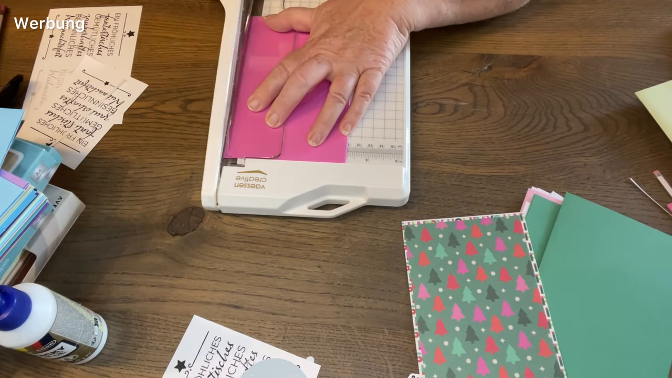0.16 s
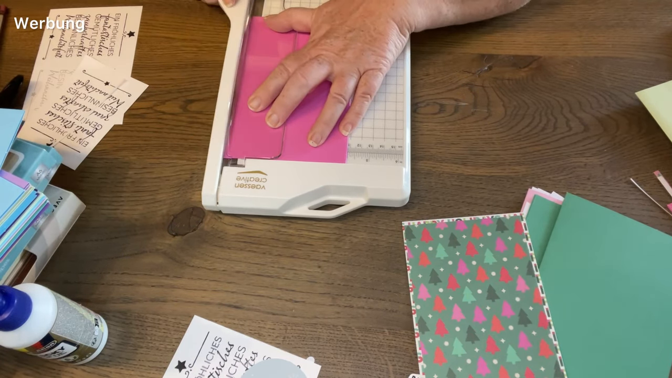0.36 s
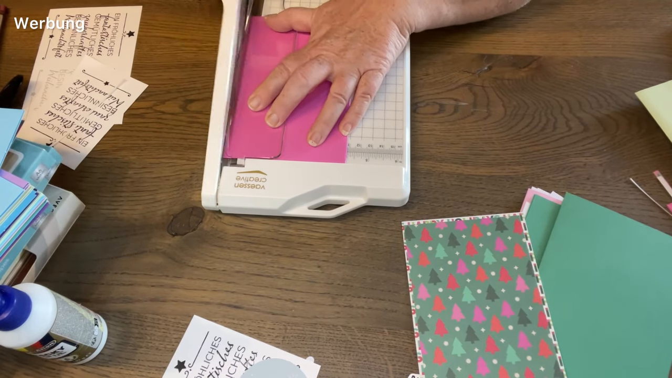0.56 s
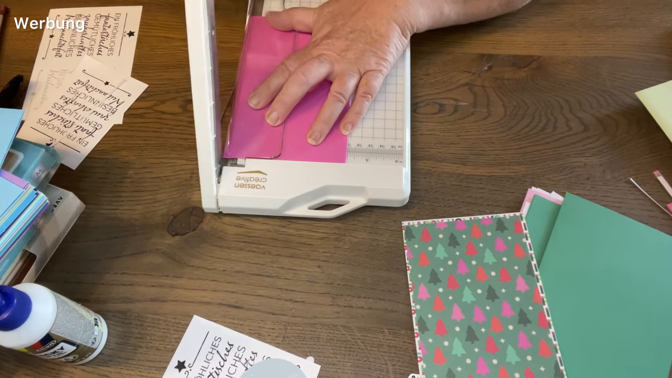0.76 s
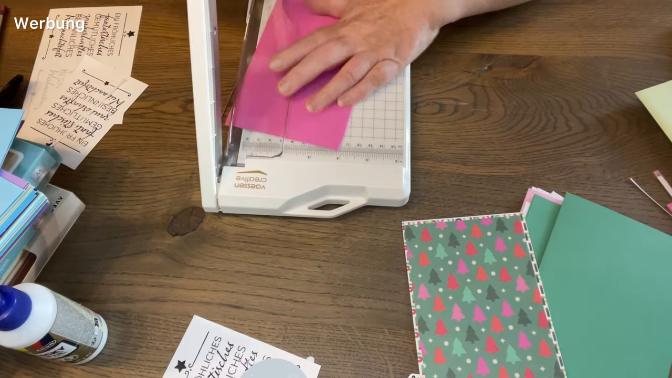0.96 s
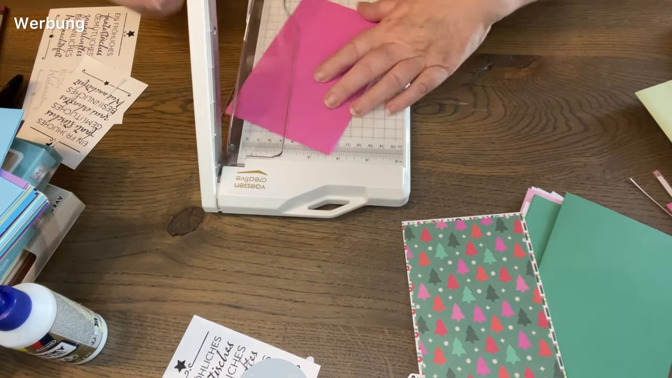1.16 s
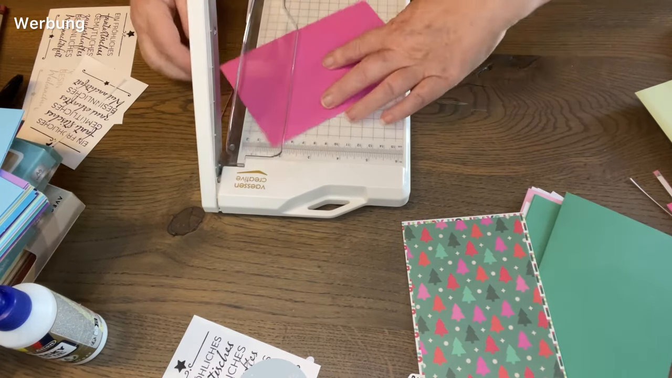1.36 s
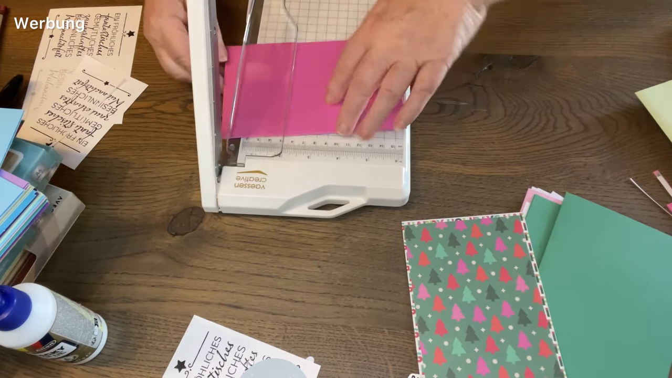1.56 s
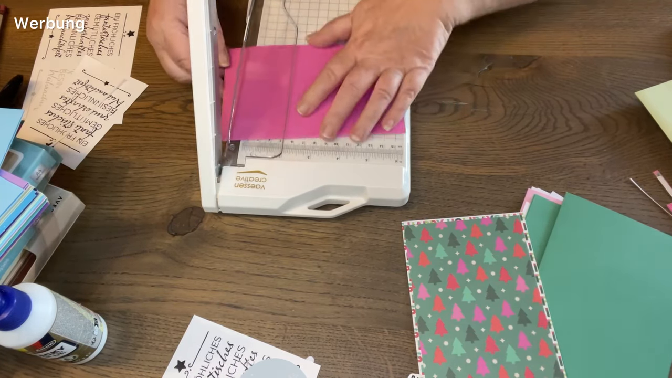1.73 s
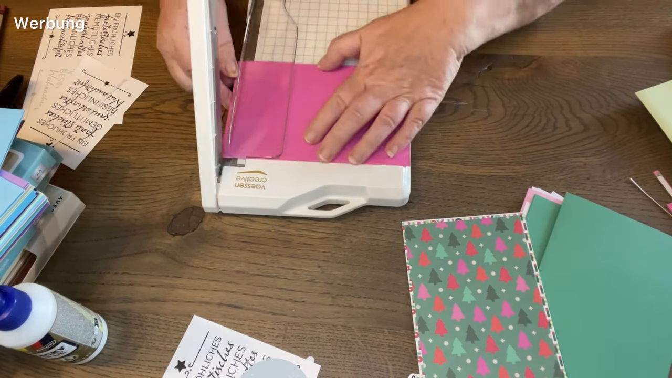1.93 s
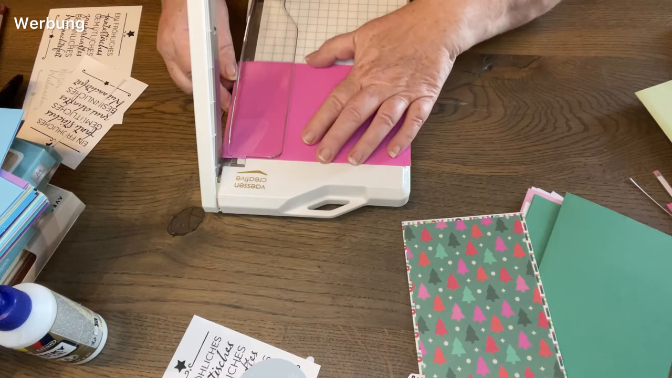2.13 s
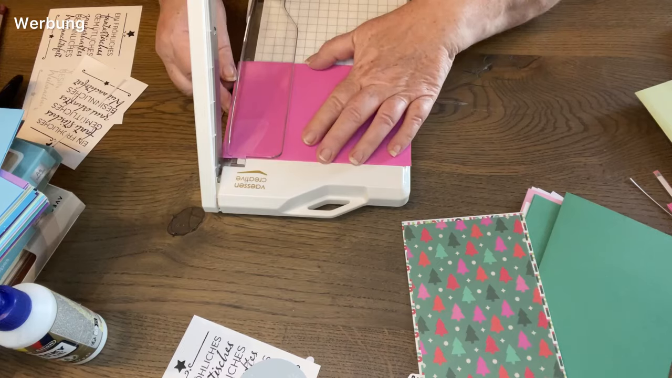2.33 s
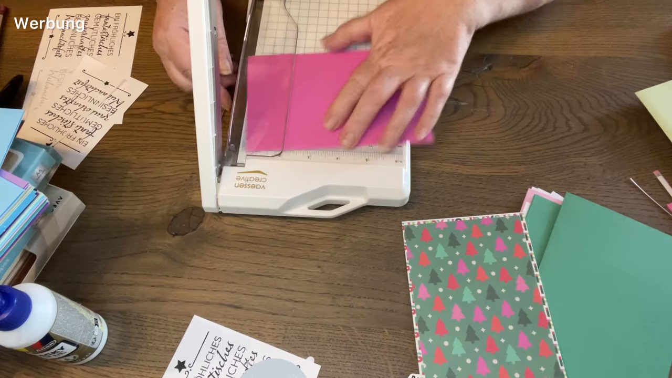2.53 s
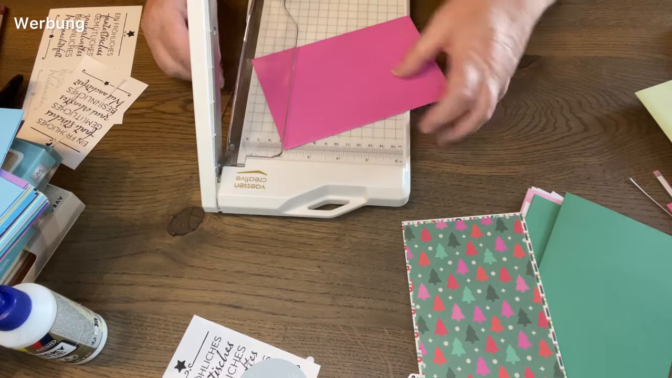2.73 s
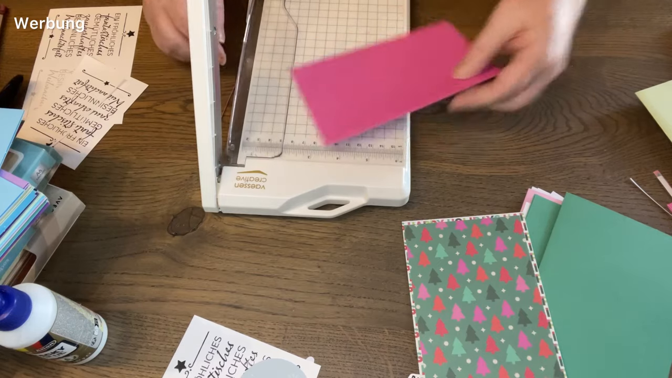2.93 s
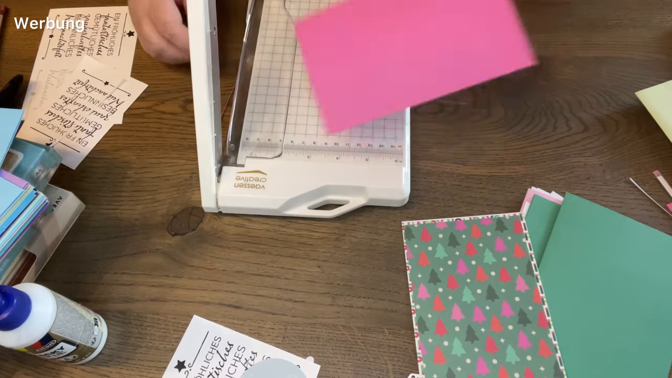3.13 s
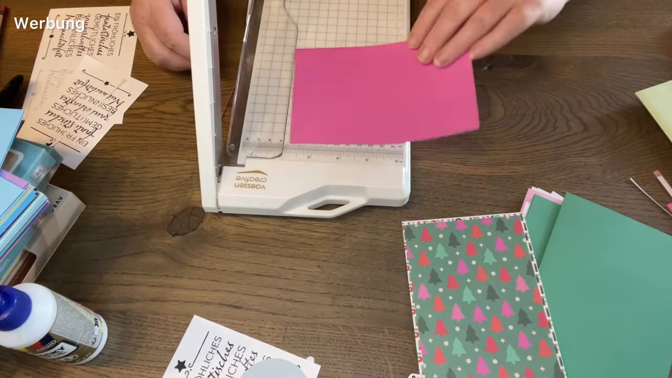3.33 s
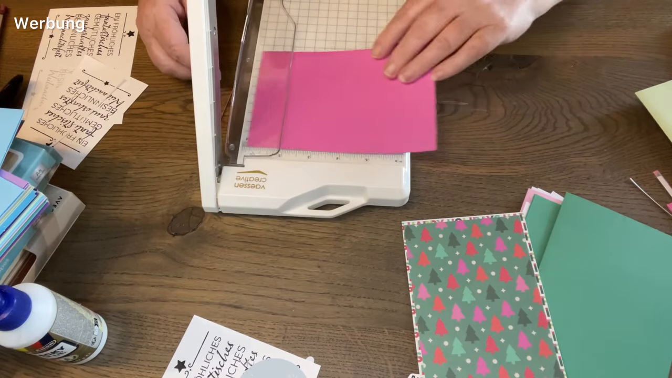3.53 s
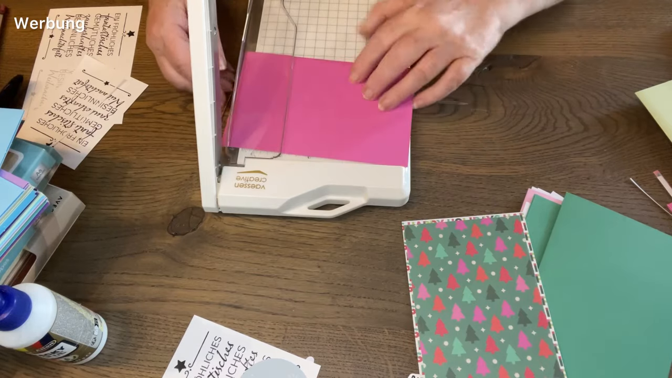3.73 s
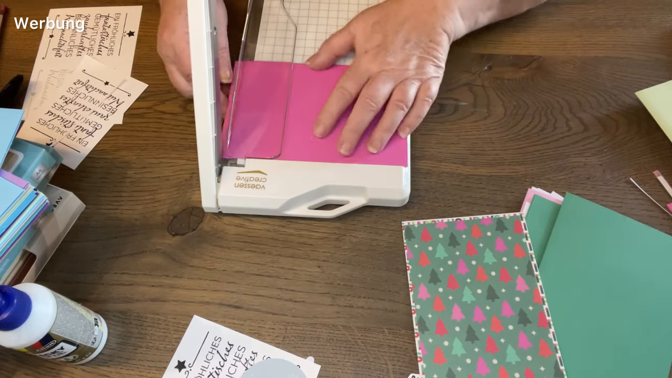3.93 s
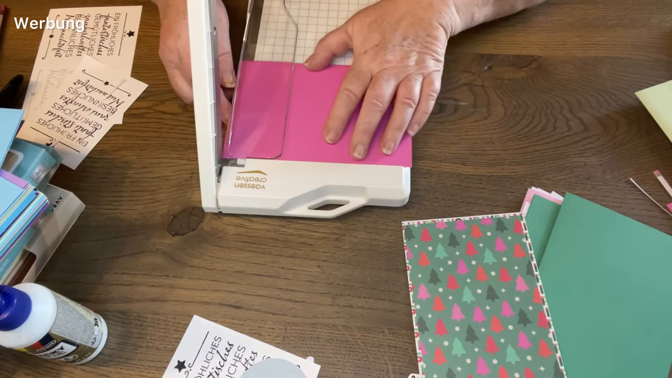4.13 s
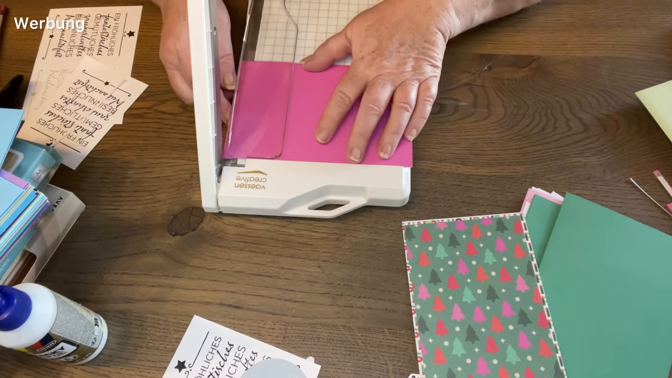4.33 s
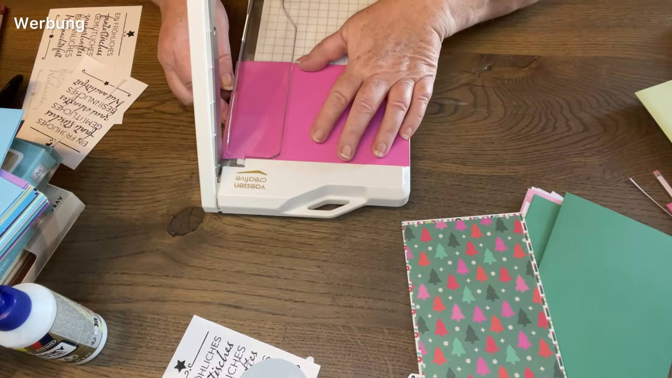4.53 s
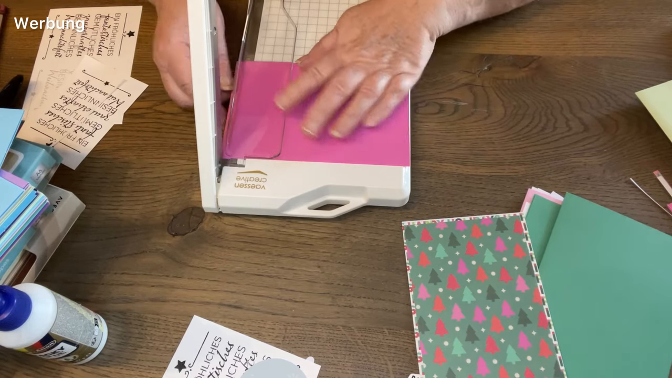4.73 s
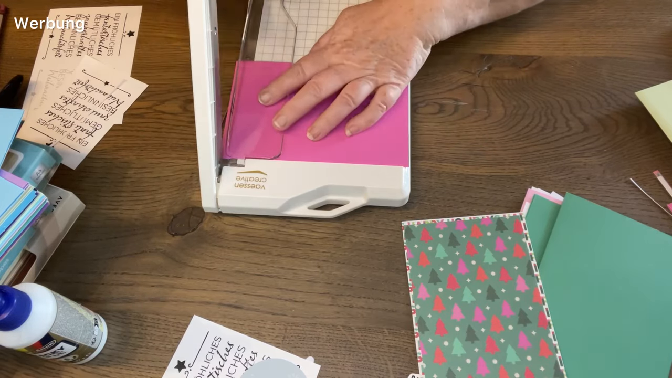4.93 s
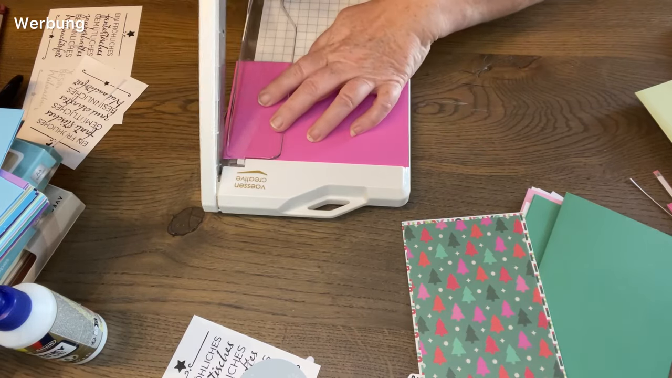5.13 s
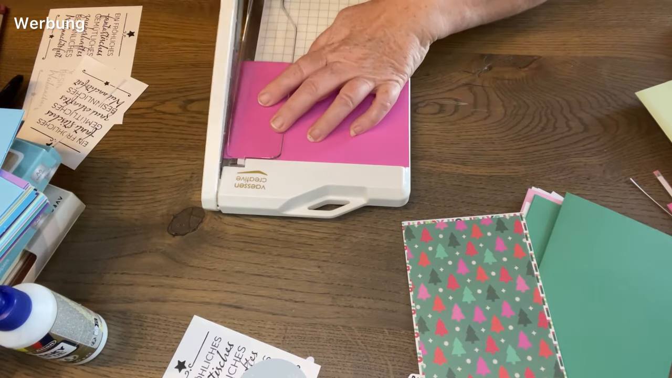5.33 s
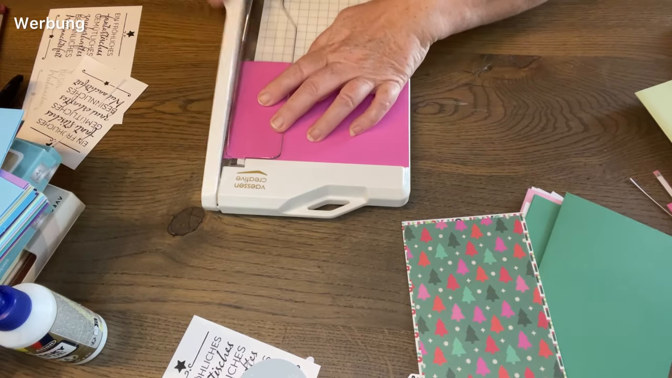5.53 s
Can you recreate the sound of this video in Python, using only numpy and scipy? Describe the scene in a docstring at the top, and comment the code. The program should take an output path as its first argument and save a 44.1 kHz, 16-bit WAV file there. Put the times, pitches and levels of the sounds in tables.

```python
"""Lever paper trimmer cutting card

A trimmer on a wooden craft table, heard by a phone hanging above it. The blade arm grinds on the steel edge
(micro-slips ringing steel, base and table), shears the card (swelling crackle) and lands on its stop; between
cuts a hand slides card (filtered hiss with drones) and taps it on the hollow plastic base (short rattles ringing
base and table). A small quiet room adds a brief diffuse tail over a faint room tone."""
import sys
import numpy as np
from scipy import signal
from scipy.fft import rfft, irfft, next_fast_len
from scipy.io import wavfile
from scipy.ndimage import uniform_filter1d, map_coordinates

SR = 44100
rng = np.random.default_rng(int(sys.argv[2]) if len(sys.argv) > 2 else 0)


def generate_wav(signal):
    """Clip the signal to [-1, 1] and save it as 16-bit WAV at the path in sys.argv[1]."""
    frames = np.transpose(np.atleast_2d(signal))
    scaled = np.clip(frames, -1, 1) * 32767
    pcm = np.round(scaled).astype(np.int16)
    wavfile.write(sys.argv[1], SR, pcm)


N = 250223
TIME = np.arange(N) / SR

# hollow plastic base, free modes: [f/Hz, relative level/dB, free t60/s]
BASE_MODES = [(530, -24, 0.036), (692, -4, 0.26), (733.5, -4.5, 0.3), (847.4, -9.5, 0.27),
              (930, -8, 0.0084), (1133, -0.5, 0.088), (1371, -1, 0.024), (1556, 1, 0.078), (1697, -2, 0.12),
              (1902, 3, 0.058), (2016, 6, 0.017), (2262, 0, 0.1), (2626, 2, 0.037), (3090, 2, 0.021),
              (3450, -3.5, 0.085), (3880, -2, 0.047), (4400, -5, 0.0091)]
# wooden table top modes: [f/Hz, relative level/dB, t60/s]
TABLE_MODES = [(59.7, -1, 0.42), (89, -11.5, .3), (137, 1.5, 0.1), (164, -4.5, 0.11), (204, 6.5, 0.085),
               (261, 7.5, 0.045), (345, -6, 0.019), (465, 1, 0.085)]
# steel blade modes: [f/Hz, relative level/dB, t60/s]
BLADE_MODES = [(2940, -4, .012), (3400, -1, 0.01), (3920, 1.5, 0.012), (4800, 2.5, 0.012), (5300, -5, .008),
               (6300, -2, 0.031), (8900, -5.5, 0.008), (10260, -2, .008)]
HAND_T60_SHARE = .4  # a hand on the base shortens its ring


def undb(db):
    """Amplitude factor of a level in dB."""
    return 10 ** (np.asarray(db) / 20)


def unit(x):
    """Scale to unit RMS."""
    return x / np.sqrt(np.mean(x ** 2))


def colour(x, points):
    """Filter by (f/Hz, level/dB) points, interpolated over log frequency, to unit RMS."""
    hz, db = np.transpose(points)
    size = next_fast_len(len(x))
    f = np.maximum(np.fft.rfftfreq(size, 1 / SR), 1)
    gain = undb(np.interp(np.log(f), np.log(hz), db))
    return unit(irfft(rfft(x, size) * gain, size)[:len(x)])


def split_treble(x):
    """Parts below and above a broad crossover."""
    crossover_hz = 7000
    weight = np.clip(np.fft.rfftfreq(N, 1 / SR) / crossover_hz - .5, 0, 1)
    top = irfft(rfft(x) * weight, N)
    return x - top, top


def wander(rate_hz):
    """Random levels, rate_hz of them a second, joined by straight ramps."""
    k = int(SR / rate_hz)
    steps = np.repeat(rng.standard_normal(N // k + 1), k)
    return uniform_filter1d(steps, k)[:N]


def grit(spread_db, flicker_db, rate_hz):
    """Dense micro-slips of uneven size whose strength flickers as the grip changes."""
    size_db = spread_db * rng.exponential(size=N)
    return rng.standard_normal(N) * undb(size_db + flicker_db * wander(rate_hz))


def ring(modes, gain_db=0, length_s=0.18):
    """Impulse response: a sum of exponentially decaying sine modes."""
    hz, db, t60 = np.transpose(modes)[:, :, None]
    t = TIME[:int(length_s * SR)]
    decay = np.exp(-np.log(1000) * t / t60)
    return np.sum(undb(db + gain_db) * decay * np.sin(2 * np.pi * hz * t), 0)


def through(x, response):
    """Drive a resonant body with x, to unit RMS."""
    return unit(signal.fftconvolve(x, response)[:N])


def rubbed(slips, modes, shift_db, rate_hz):
    """The contact point travels, so each mode swells and fades on its own."""
    total = 0
    for mode in modes:
        excited = signal.oaconvolve(slips, ring([mode], length_s=0.13))[:N]
        total = total + undb(shift_db * wander(rate_hz)) * excited
    return unit(total)


def stroke_curve(strokes, column):
    """One column over time; the level is silent outside the strokes."""
    rows = []
    for stroke in strokes:
        first, last = stroke[0], stroke[-1]
        rows += [(first[0] - .01, -120, *first[2:]), *stroke, (last[0] + .01, -120, *last[2:])]
    rows = np.array(rows)
    return np.interp(TIME, rows[:, 0], rows[:, column])


def room_tone():
    """Faint coloured noise, partly unlike left and right; its level dips briefly."""
    level_db = -77.5
    # spectrum: [f/Hz, relative level per Hz/dB]
    air_spectrum = [(18, -40), (40, -9.5), (110, -14), (150, 8.5), (210, -7.5), (470, -10.5), (2000, -17.5),
                    (16000, -28)]
    # brief dip: from t/s, to t/s, depth/dB
    start_s, end_s, depth_db = (4.47, 4.76, -8.5)
    dip_db = depth_db * np.clip(np.minimum(TIME - start_s, end_s - TIME) / 0.038, 0, 1)
    mid, side = (colour(rng.standard_normal(N), air_spectrum) for _ in range(2))
    return undb(level_db + dip_db) * (mid + .4 * np.outer([1, -1], side))


def room(x):
    """Diffuse tail of octave noise bands, each with its own decay, partly unlike at the two ports."""
    # tail: [f/Hz, t60/s, share unlike at the two ports]
    tail_hz, tail_t60, tail_apart = np.transpose([(99, 0.2, 0.4), (300, 0.22, 0.7), (600, 0.3, 3),
                                                  (2020, 0.13, 1.2), (5260, 0.15, 3.7),
                                                  (15200, 0.094, 0.78)])
    t, tail = TIME[:int(.4 * SR)], 0
    for hz in 60 * 2. ** np.arange(8.5):
        t60, apart = (np.interp(np.log(hz), np.log(tail_hz), c) for c in (tail_t60, tail_apart))
        octave = signal.butter(2, [hz / 2 ** .5, hz * 2 ** .5], "band", fs=SR, output="sos")
        mid, side = signal.sosfilt(octave, rng.standard_normal((2, len(t))))
        pair = np.array([mid + apart * side, mid - apart * side]) / np.hypot(1, apart)
        tail = tail + pair * np.exp(-np.log(1000) * t / t60)
    tail = tail * np.minimum(t / 0.0085, 1)  # onset ramp, s
    tail = tail / np.sqrt(np.sum(tail ** 2) / 2)
    return signal.fftconvolve(x[None], tail, axes=1)[:, :N]


def ports(x, column):
    """Sound bends round the phone to each port with a lag and shade that depend on where it comes from."""
    # phone ports: [f/Hz, left lead for the trimmer/rad, left lead for the sliding card/rad, left minus right/dB]
    port_table = np.transpose([(60, 0, 0, -.3), (700, -.1, -.4, -2.8), (1400, -.15, -.4, -.9),
                               (2100, -1.1, -1.1, -1.1), (3300, -.8, -2.3, -.5), (4400, -.3, -2.3, .1),
                               (5200, -1.7, -3.2, -.1), (6400, -2.1, -3.3, -.2), (7750, -3.1, -3.0, -.3),
                               (11000, -6.3, -6.4, -.1), (14300, -6.2, -6.1, -.1), (16000, -9, -9, -.1)])
    size = next_fast_len(N)
    f = np.fft.rfftfreq(size, 1 / SR)
    shade = undb(np.interp(f, port_table[0], port_table[-1]) / 2)
    half = shade * np.exp(.5j * np.interp(f, port_table[0], port_table[column]))
    return irfft(rfft(x, size) * np.array([half, 1 / half]), size)[:, :N]


def slide():
    """Card dragged over ridged plastic: hiss, with a drone of base and table."""
    # strokes of card and skin: [t/s, length/s, hiss level/dB, swell by the end/dB, dull base drone over hiss/dB,
    # sharp base drone over hiss/dB, table rumble over hiss/dB, extra treble/dB]
    strokes = [(0.875, 0.21, -53.5, -2, -9, -6.5, -2, 7), (1.134, 0.37, -60, 4.5, -9.5, -9, -21, 3),
               (1.618, 0.29, -58.5, 5, -7, -4, -6, 2), (1.99, 0.061, -64.5, 7, -2.5, 0.5, -0.5, 1.5),
               (2.36, 0.098, -78, 4, -14, -12, -10, 1), (2.472, 0.1, -56.5, 2, -9, -6, -12, 7),
               (2.631, 0.12, -55, -8, -16, -3, -15, 12), (2.808, 0.088, -55.5, -3, 1, -9.5, -11, -4),
               (2.938, 0.15, -49, -12.5, -11, -15, -11, 0), (3.155, 0.034, -61.5, 10, -6, -13, -9, 0.5),
               (3.261, 0.43, -62.5, 8.5, -9, -17, -20.5, -3), (3.75, 0.05, -64.5, 7.5, -23, -28, -15, 7),
               (3.875, 0.17, -49.5, -17, -2.5, -7, -1.5, -4), (4.052, 0.042, -58.5, 1, -15, -11, -12, 1),
               (4.261, 0.13, -62, -4, -10, -5, -4, -3), (4.634, 0.017, -67.5, 0.5, -18.5, -11, -19.5, -1),
               (4.758, 0.17, -64.5, -9, -20.5, -14.5, -7.5, 0.5),
               (4.942, 0.21, -69.5, 7.5, -5, -2.5, -3, -4)]
    # hiss spectrum: [f/Hz, relative level per Hz/dB]
    hiss_spectrum = [(900, -27.5), (1600, -3.5), (3500, 0.5), (6000, -2.5), (8000, -5), (11500, -6.5),
                     (14500, -9), (16000, -18)]
    grip_db_s, lift_db_s = 507.5, 394  # rise and fall rates of a stroke
    dull_count = 9  # base modes under the card; those above answer its edge

    s, length, db, swell_db, dull_db, sharp_db, table_db, treble_db = np.transpose(strokes)[:, :, None]
    t = TIME[::32]
    swell = swell_db * np.clip((t - s) / length, 0, 1)
    before_db = grip_db_s * np.maximum(s - t, 0)
    after_db = lift_db_s * np.maximum(t - s - length, 0)
    stroke = undb(db + swell - before_db - after_db)
    hiss, dull, sharp, rumble, treble = (
        np.interp(TIME, t, (stroke * undb(g)).sum(axis=0))
        for g in (0, dull_db, sharp_db, table_db, treble_db))

    slips = grit(spread_db=1.8, flicker_db=2.8, rate_hz=55.) * undb(3.5 * wander(22.))
    held = np.array(BASE_MODES) * [1, 1, HAND_T60_SHARE ** 2]  # hand and card both damp the base
    low = rubbed(slips, held[:dull_count], shift_db=6.5, rate_hz=30.)
    high = rubbed(slips, held[dull_count:], shift_db=6.5, rate_hz=30.)
    table = rubbed(slips, TABLE_MODES, shift_db=5.0, rate_hz=25.)
    rustle, top = split_treble(colour(slips, hiss_spectrum))
    return hiss * rustle + treble * top + dull * low + sharp * high + rumble * table


def table_responses(t):
    """Table answers to a blow, both late: a thud of the upper modes, a slow sway of the lowest two."""
    thud_hz, lag_s, sway_rise_s = 194, 0.0036, 0.03  # modes round thud_hz take up a blow best
    upper = TABLE_MODES[2:]
    late = np.maximum(t - lag_s, 0)
    push = late * np.exp(-late / 0.00027)
    uptake_db = -4 * np.abs(np.log2(np.array(upper)[:, :1] / thud_hz))
    thud = signal.fftconvolve(push, ring(upper, uptake_db))[:len(t)]
    sway = ring(TABLE_MODES[:2], length_s=.45) * np.minimum(t / sway_rise_s, 1)
    return thud, np.roll(sway, int(lag_s * SR))


def base_knock(rattle, shiver, hz):
    """Base struck by a rattle: detuned modes, the struck spot's own pitch and a dry knock round it."""
    detune = .035  # the hand's weight shifts the modes from blow to blow
    own_db, own_t60_s, knock_db = -3, 0.046, -2.5
    n = len(rattle)
    base_hz = np.array(BASE_MODES)[:, :1]
    # a soft contact loses the modes above its pitch
    above_db = -5 * np.log2(1 + (base_hz / hz / 1.4) ** 3)
    below_db = -4 * np.log2(1 + (hz / base_hz / 1.6) ** 2)
    held = np.array(BASE_MODES) * [1 + detune * rng.standard_normal(), 1, HAND_T60_SHARE]
    modes = signal.fftconvolve(rattle + shiver, ring(held, above_db + below_db))[:n]
    own = signal.fftconvolve(rattle, ring([(hz, 0, own_t60_s)]))[:n]
    # dense, quickly damped modes between them merge into a dry knock
    band = signal.butter(3, [hz / 2.5, hz * 1.8], "band", fs=SR, output="sos")
    knock = signal.sosfilt(band, rattle + shiver)
    levels_db = 0, own_db, knock_db
    return sum(undb(g) * p / np.abs(p).max() for g, p in zip(levels_db, (modes, own, knock)))


def taps():
    """Each contact is a short rattle: it snaps, knocks the base broadly round its pitch and thuds the table."""
    # taps and blows: [t/s, base peak level/dB, snap over it/dB, table thud over it/dB, contact time scale/s, base f/Hz]
    contacts = [(0.241, -14, -14, -30, 0.0089, 1120), (0.256, -16.5, 6.5, -33, 0.012, 3870),
                (0.263, -5.5, -20, -4, 0.0051, 1677), (0.2666, -10, -28, 6.5, 0.007, 1560),
                (0.269, -9.5, -4, -8, 0.0026, 628), (0.443, -39, -23, -30, 0.008, 2180),
                (0.486, -23.5, -28, -45, 0.03, 1630), (0.505, -22.5, -32, -48, 0.013, 1540),
                (0.523, -16, -8, -34, 0.0053, 2550), (0.526, -24.5, -30.5, -20, 0.0046, 730),
                (0.752, -37.5, -24, -2.5, 0.012, 1100), (0.821, -39.5, -12, -2, 0.0055, 1670),
                (0.852, -26, -25, -32, 0.0043, 1790), (0.897, -9, -42.5, -4, 0.005, 623),
                (0.906, -22.5, -30, -14, 0.0041, 470), (1.066, -39, -10.5, 3.5, 0.016, 710),
                (1.399, -44, 4, -15, 0.017, 1710), (1.483, -37.5, -9.5, -48, 0.013, 783),
                (1.585, -42, -13.5, -5, 0.011, 1680), (1.654, -54, -13.5, 10.5, 0.012, 646),
                (1.745, -27.5, -40.5, -31, 0.01, 794), (1.781, -41, -27.5, 2, 0.011, 730),
                (1.806, -39, -36, -11, 0.014, 1100), (1.903, -26.5, -11.5, -51.5, 0.0043, 1750),
                (1.915, -39, -18.5, -30.5, 0.012, 1098), (2.264, -44.5, -25.5, -4, 0.012, 728),
                (2.487, -43, -8.5, -9.5, 0.017, 744), (2.813, -34, -22.5, -39, 0.0086, 752),
                (2.815, -31.5, -24.5, -39, 0.0067, 2240), (2.912, -49, -28.5, 8, 0.0062, 443),
                (2.951, -51.5, -22.5, 16.5, 0.012, 478), (2.972, -43, -18.5, -0.5, 0.012, 1510),
                (3.175, -33.5, -24.5, -29, 0.0065, 1200), (3.182, -24, -31, -35, 0.0046, 927),
                (3.199, -34.5, -26, -11, 0.012, 555), (3.258, -39, -25, -30, 0.0064, 750),
                (3.338, -44, -29, -38, 0.0076, 396), (3.354, -19, -39, -41, 0.011, 1290),
                (3.359, -20, -11, -37, 0.01, 1698), (3.386, -35.5, -28, -19.5, 0.024, 856),
                (3.489, -50.5, 9.5, -24.5, 0.0076, 660), (3.664, -51.5, -16.5, 8, 0.006, 450),
                (3.676, -30, -22, -11.5, 0.014, 2350), (3.682, -22, 10.5, -17, 0.0015, 2190),
                (3.694, -35.5, -17.5, 1, 0.01, 1780), (3.824, -42, -18.5, 0.5, 0.0017, 1000),
                (3.897, -52, -8, 15.5, 0.0037, 672), (3.928, -21, -14, -32, 0.0039, 1920),
                (3.931, -22.5, -21, -33, 0.0047, 3110), (4.107, -32.5, -24, -25, 0.01, 1510),
                (4.113, -27.5, -9.5, -27, 0.021, 1420), (4.147, -42.5, -19, -1.5, 0.0064, 2670),
                (4.224, -51.5, -19.5, -10, 0.019, 503), (4.343, -56, -23.5, -5, 0.012, 497),
                (4.419, -52.5, -19, -26.5, 0.01, 1507), (4.427, -44, -21.5, -24.5, 0.013, 1820),
                (4.447, -46, -18.5, -27, 0.014, 1607), (4.765, -52, 7, -8, 0.0058, 1898),
                (4.851, -49, -4, -24, 0.0051, 704), (4.864, -38.5, -9.5, -27, 0.0042, 2950),
                (4.94, -54.5, 10, -21, 0.0085, 1890), (5.028, -38.5, -27.5, 6.5, 0.0096, 1756),
                (5.53, -16, -11.5, -29, 0.0051, 2280), (5.533, -16, -27.5, -9, 0.0048, 620),
                (5.538, -19, -7, 7.5, 0.0039, 460), (5.56, -10.5, 3.5, -23, 0.0043, 4390),
                (5.573, -15, -8, 5.5, 0.0039, 1930), (5.576, -14, -18, -4.5, 0.0021, 684)]
    sway_db, heavy_db = -32, -11  # sway over thud; blows below heavy_db rock the table top less
    out, t = np.zeros(N + SR), TIME[:int(.45 * SR)]
    snap_filter = signal.butter(1, [4800, 7200], "band", fs=SR, output="sos")
    thud, sway = table_responses(t)
    for s, db, snap_db, thud_db, contact_s, hz in contacts:
        x = t / max(contact_s, .0005)
        grains = rng.standard_normal(len(t)) * undb(3.0 * rng.exponential(size=len(t)))
        rattle = grains * x ** 0.89 * np.exp(-2.3 * x)
        # card and loose guide shiver on for a moment
        shiver = undb(-30.0) * rng.standard_normal(len(t)) * (1 - np.exp(-x)) * np.exp(-t / 0.049)
        body = base_knock(rattle, shiver, hz)
        # the snap belongs to the hardest instant of the contact
        snap = signal.sosfilt(snap_filter, rattle * (x * np.exp(-2.5 * x)) ** 3.3)
        rock_db = thud_db + sway_db + 1.3 * min(db - heavy_db, 0)
        levels_db = 0, snap_db, thud_db, rock_db
        sound = sum(undb(g) * p / np.abs(p).max() for g, p in zip(levels_db, (body, snap, thud, sway)))
        i = max(int((s - .0007) * SR), 0)
        out[i:i + len(t)] += undb(db) * sound
    return out[:N]


def shear():
    """Fibres part in a fine crackle; blade and base take up part of it."""
    # card shearing, strip tearing free: [loudest t/s, rise/s, peak level/dB, fall t60/s, body over peak/dB, extra treble/dB]
    tears = [(0.258, 0.017, -16.5, 0.066, -26, 4.5), (0.523, 0.028, -22.5, 0.13, -32.5, -4.5),
             (0.559, 0.049, -19.5, 0.24, -19, -2), (5.563, 0.04, -21.5, 0.053, -18, 5)]
    # crackle spectrum: [f/Hz, relative level per Hz/dB]
    fibre_spectrum = [(900, -36), (1600, -9), (2600, -3.5), (3800, -4), (6300, 0.5), (8000, -3.5),
                      (10000, -5.5), (13500, -11.5), (16000, -16.5)]
    rise_db, rise_power = 42.5, 4  # a tear swells by rise_db over its rise, along a power curve
    body_rise_s, body_t60_s = 0.02, 1  # the base answers from the start of a tear and dies slowly
    blade_db, tail_db = -17, -4.5  # blade under crackle; loose fibres rustling on under the body

    s, rise, db, t60, body_db, treble_db = np.transpose(tears)[:, :, None]
    swell_db = -rise_db * np.clip((s - TIME) / rise, 0, 3) ** rise_power
    tear = undb(db + swell_db - 60 * np.maximum(TIME - s, 0) / t60)
    coarse_level = tear.sum(axis=0)
    treble_level = (tear * undb(treble_db + .5 * swell_db)).sum(axis=0)
    since = np.maximum(TIME - s + rise, 0)
    onset = np.minimum(since / body_rise_s, 1) ** 2
    body_level = (onset * undb(db + body_db - 60 * since / body_t60_s)).sum(axis=0)

    slips = grit(spread_db=1.6, flicker_db=2.8, rate_hz=150.)
    blade = rubbed(slips, BLADE_MODES, shift_db=12.5, rate_hz=62.0)
    crackle = unit(colour(slips, fibre_spectrum) + undb(blade_db) * blade)
    coarse, top = split_treble(crackle)
    held = np.array(BASE_MODES) * [1, 1, HAND_T60_SHARE]
    base = rubbed(slips, held, shift_db=4.0, rate_hz=56.0)
    tail = undb(tail_db) * body_level * crackle
    return coarse_level * coarse + treble_level * top + tail + body_level * base


def grind():
    """Steel on steel: slips shake base and table and ring the blade, whose broad tones drift as the contact travels."""
    # one curve a stroke: [t/s, level/dB, then over it: low base modes/dB, table drone/dB, bright scrape/dB]
    strokes = [
        [(0.0, -25.5, 4, -14, -5.5), (0.05, -29.5, -6, -25, -13), (0.08, -28, -3.5, -11, -8.5),
         (0.12, -26, -2, -25, -9.5), (0.162, -28.5, -9, -15, -10.5), (0.182, -25, -12.5, -25, -15),
         (0.192, -32.5, 0.5, -5, -4.5), (0.206, -25.5, -4.5, -31, -19), (0.216, -33.5, 0, -21, -7),
         (0.24, -31.5, -16, -5, -19), (0.245, -33, -14, 12, -5)],
        [(5.122, -58, -14.5, 6.5, -7.5), (5.13, -46.5, -12.5, -9, -4), (5.14, -42, -26, -1, -8),
         (5.254, -28.5, -15, -5, -7.5), (5.332, -27, -15, -14, -8), (5.362, -28.5, 3.5, -7, -5.5),
         (5.38, -28, -8, -7, -5), (5.422, -30.5, 2.5, -9, -4), (5.452, -43.5, 0, -1, -20),
         (5.484, -53, 0, 0, -5), (5.505, -47, -4, -14, -8), (5.512, -38.5, -5, -10.5, -3),
         (5.528, -39, 4, -6, -13)],
    ]
    # scrape spectrum: [f/Hz, relative level per Hz/dB]
    scrape_spectrum = [(1500, -21), (2600, -16.5), (4500, -5), (7000, 2), (10000, -10), (13000, -16),
                       (16000, -19.5)]
    # blade tones as the arm travels down the edge and back: [t/s, pitch shift/share]
    pitch_points = [(0, -0.02), (.24, 0.02), (5.12, .02), (5.43, -0.02)]
    tilt_db_oct = -3.5  # the arm's pivot drives the low base modes harder
    arm_t60_share = .6  # the pressing arm shortens the ring of the base
    low_count = 4  # lowest base modes, with a level curve of their own

    pitch = np.interp(TIME, *np.transpose(pitch_points))
    db, low_db, table_db, bright_db = (stroke_curve(strokes, column=k) for k in range(1, 5))
    tilted = [(hz, g + tilt_db_oct * np.log2(hz / 1000), arm_t60_share * t60) for hz, g, t60 in BASE_MODES]
    slips = grit(spread_db=-0.84, flicker_db=2.0, rate_hz=90.)
    tones = [rubbed(slips, tilted[:low_count], shift_db=5.0, rate_hz=45.0),
             rubbed(slips, tilted[low_count:], shift_db=3.5, rate_hz=40.0),
             rubbed(slips, BLADE_MODES, shift_db=4.5, rate_hz=30.0)]
    # reading faster raises every tone; the base shifts less than the blade
    speed = 1 + np.outer([.6, .8, 1], pitch + 0.037 * wander(15.))
    place = np.cumsum(speed, axis=1) % (N - 1)
    low, high, blade = (map_coordinates(x, [p], order=3) for x, p in zip(tones, place))
    bright = unit(colour(slips, scrape_spectrum) + blade)
    table = through(slips, ring(TABLE_MODES[3:]))
    return undb(db) * (high + undb(low_db) * low + undb(table_db) * table + undb(bright_db) * bright)


def scene():
    """Trimmer and card, each with its share of room, reach the two ports over the room tone."""
    trimmer_room_db, card_room_db = -11.5, -5.5
    card = slide()
    trimmer = taps() + shear() + grind()
    card_heard = ports(card + undb(card_room_db) * room(card), column=2)
    trimmer_heard = ports(trimmer + undb(trimmer_room_db) * room(trimmer), column=1)
    return room_tone() + card_heard + trimmer_heard


def record(dry):
    """The phone cuts the lowest bass, rounds the loudest peaks and cuts the top."""
    low_cut_hz, ceiling, top_hz = 55, .95, 15900
    dry = signal.sosfilt(signal.butter(4, low_cut_hz, "high", fs=SR, output="sos"), dry)
    dry = dry / (1 + (dry / ceiling) ** 4) ** .25
    return signal.sosfilt(signal.ellip(10, .2, 80, top_hz, fs=SR, output="sos"), dry)


dry = scene()
out = record(dry)
generate_wav(out)
```